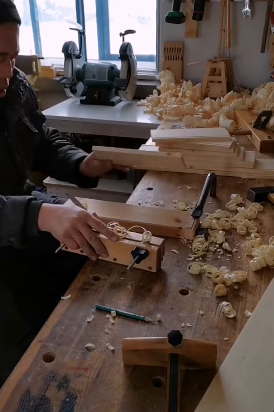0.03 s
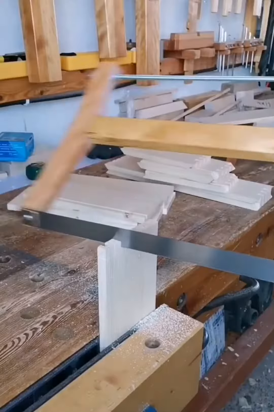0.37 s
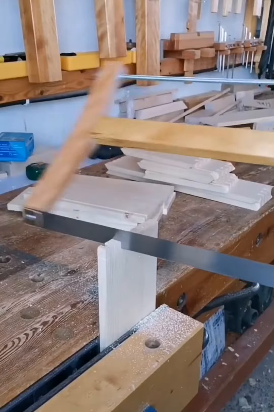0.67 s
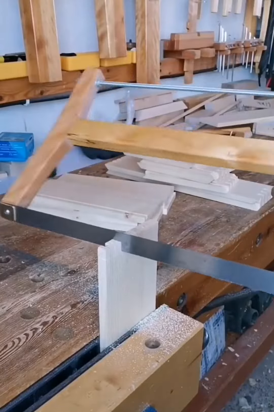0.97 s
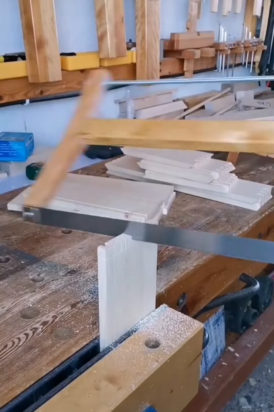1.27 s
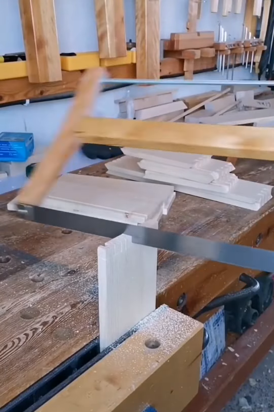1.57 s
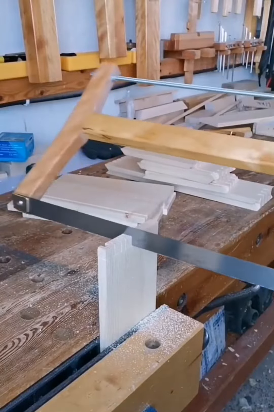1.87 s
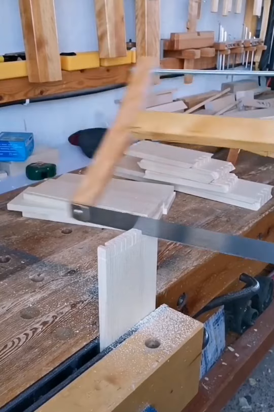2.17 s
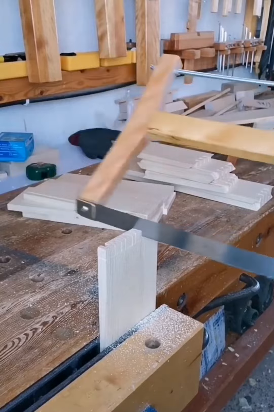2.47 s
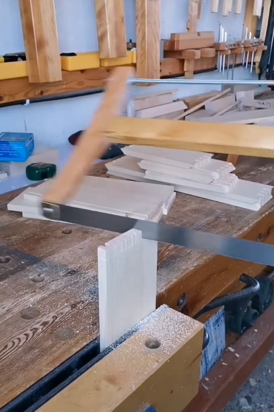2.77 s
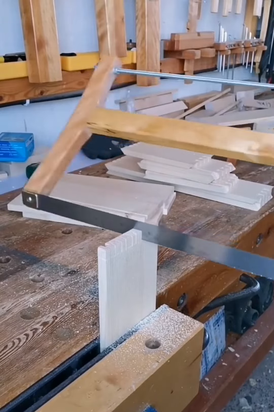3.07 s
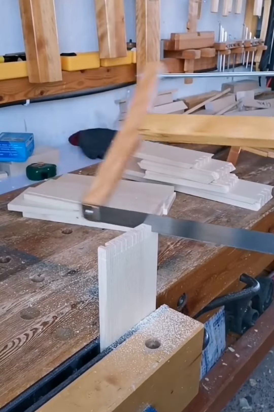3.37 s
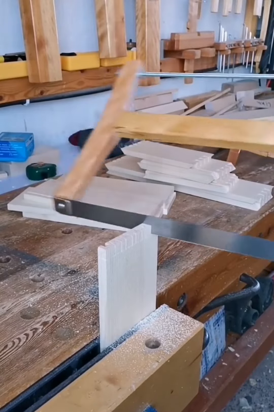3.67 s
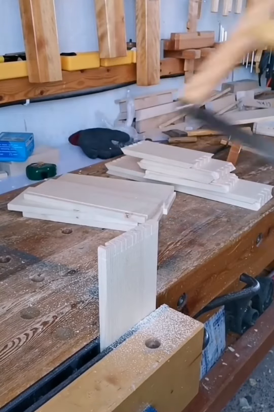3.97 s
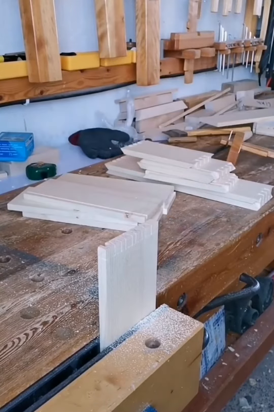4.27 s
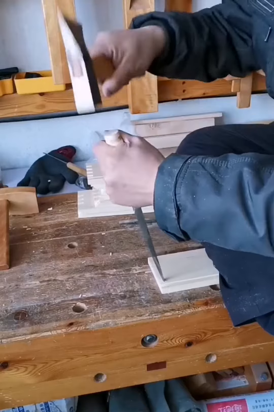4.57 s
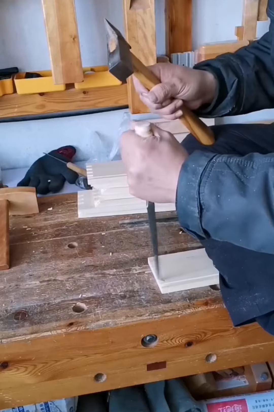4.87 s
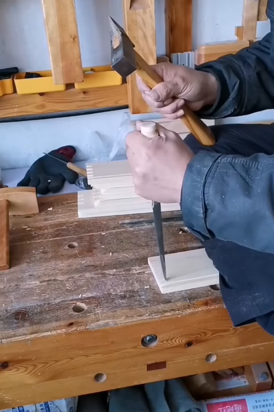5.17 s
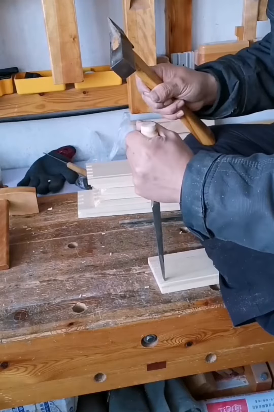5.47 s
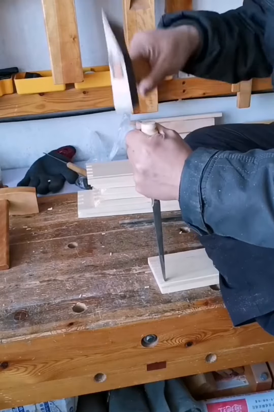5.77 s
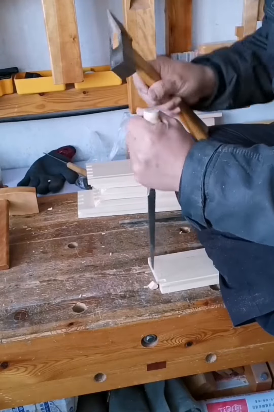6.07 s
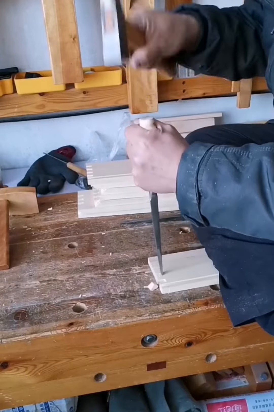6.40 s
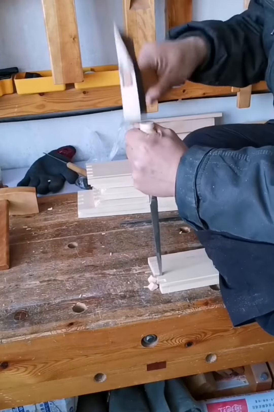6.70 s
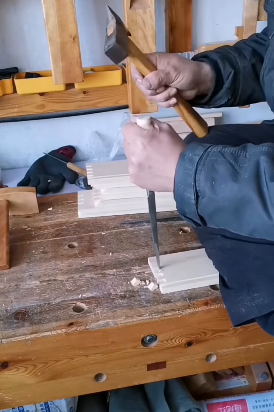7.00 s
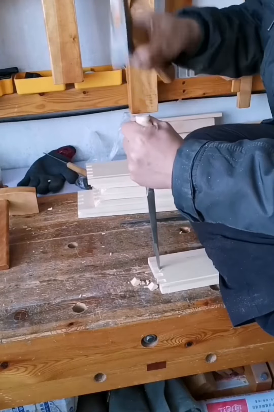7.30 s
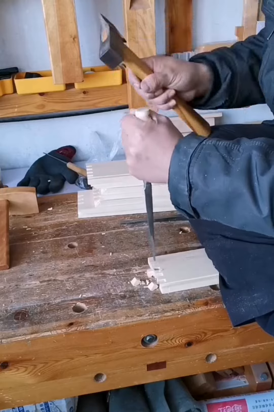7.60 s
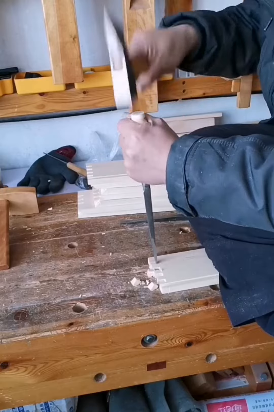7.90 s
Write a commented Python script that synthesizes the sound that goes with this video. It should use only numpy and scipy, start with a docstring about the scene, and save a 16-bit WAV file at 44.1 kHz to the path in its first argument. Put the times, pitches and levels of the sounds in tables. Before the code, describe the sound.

Heard close up in stereo in a small woodworking shop, wood slides on a bench, then a hand saw rasps rapidly back and forth, making the board ring and the bench rumble. The blade lifts out and a soft hiss follows. For the second half, a hammer taps a chisel in quick clusters of two to four sharp knocks, with dull thuds underneath and a short echo over faint room hiss.

```python
"""A board scrapes over a workbench, close to a stereo microphone in a small woodworking shop.
A frame saw then cuts a thin board in the vice, in four runs of quick pushes and pulls: its teeth
tear fibres and shake blade, board and bench. After a soft sliding hiss, a steel hammer drives a
wooden-handled chisel in groups of two to four blows. Handle and steel crack, the bench thuds and
the near walls answer. Behind it all lies the faint hiss of the room."""
import sys
import numpy as np
from scipy import signal
from scipy.fft import rfft, irfft, next_fast_len
from scipy.io import wavfile
from scipy.ndimage import uniform_filter1d

SR = 44100
rng = np.random.default_rng(int(sys.argv[2]) if len(sys.argv) > 2 else 0)


def file_out(sig):
    """Save sig as 16-bit WAV at sys.argv[1]."""
    # one column per channel
    cols = np.atleast_2d(sig).T
    # limit, then scale
    lim = np.clip(cols, -1, 1)
    pcm = np.round(lim * 32767).astype(np.int16)
    wavfile.write(sys.argv[1], SR, pcm)


N = 359106

# At the vice, the saw is pushed and bites: t/s, rise/s, rasp/dB, board ring/dB
SAW_PUSHES = [(.436, 0.0025, -19, -22.5), (.704, 0.019, -19.5, -21.5), (0.954, 0.015, -22, -21),
              (1.139, 0.029, -26.5, -23.5), (1.463, .01, -20, -21), (1.722, 0.011, -20.5, -21.5),
              (1.911, 0.014, -24, -18), (2.017, 0.0033, -19, -23.5), (2.272, .008, -19, -26.5),
              (2.526, 0.0097, -20, -25), (2.777, .01, -20, -22.5), (3.004, 0.024, -25.5, -23),
              (3.232, 0.028, -19, -22.5), (3.492, 0.011, -18.5, -19.5), (3.745, 0.012, -23, -20.5),
              (3.902, 0.01, -31, -23), (3.953, 0.0083, -31.5, -34)]
# It is drawn back, more lightly: t/s, rasp/dB, board ring/dB
SAW_PULLS = [(.571, -25, -21.5), (.847, -24, -26), (1.088, -30.5, -27.5), (1.218, -42.5, -35),
             (1.318, -21.5, -23), (1.611, -25, -24.5), (1.835, -30, -25), (2.147, -24.5, -25),
             (2.404, -25.5, -30), (2.662, -24, -23.5), (2.901, -28, -30.5), (3.118, -25.5, -22.5),
             (3.198, -23, -28), (3.375, -23.5, -22), (3.627, -25, -23.5)]
# Runs with one grip; the last lifts the blade out: stop/s, fizz re rasp/dB, blade re rasp/dB, L-R/dB
SAW_RUNS = [(1.268, -0.5, -25.5, 0.7), (1.965, 0.25, -6, 1.1), (3.156, .5, -12.5, 0.6),
            (3.953, -3.5, -6, 2.2), (4.049, 3, -8, 0.5)]
# Teeth snag and jolt the board: t/s, level/dB, f/Hz
TOOTH_CATCHES = [(.438, -4.5, 666), (1.47, -12, 309.6), (1.92, -14.5, 637), (2.019, -17.5, 830),
                 (2.283, -23, 307), (2.534, -19.5, 666), (2.784, -17, 630), (3.502, -14, 852),
                 (3.912, -11, 601)]
# Hammer on chisel, and a short swell of hiss added just before each crack, not made by the tools:
# t/s, crack/dB, brightness/dB, bench thud/dB, added hiss/dB, L-R/dB
HAMMER_BLOWS = [(4.4742, -9.5, -11, -22, -37, 0.5), (4.6, -13.5, -0.3, -39, -18.5, 0.5),
                (4.7225, -12.5, -0.5, -28, -28, 4), (5.7847, -17.5, -4, -30.5, -29, 1.5),
                (5.939, -15.5, 3, -36, -18, 2), (6.422, -19, -3, -31, -37, 0),
                (6.57, -12.5, 0.4, -39.5, -24, 0), (6.69, -15, -5, -41.5, -32, .5),
                (6.805, -29, -1.5, -39.5, -40.5, -0.5), (7.276, -19.5, -6, -32, -28.5, -1),
                (7.4299, -13, 2.3, -35, -19.5, -1), (7.891, -22.5, -1.5, -41.5, -30.5, 0),
                (8.0139, -17, 4.5, -46, -29.5, -1.5), (8.1348, -27.5, 0, -28, -36, -1.5)]
# Wood slides on the bench: start/s, end/s, rise/s, level/dB, treble lift/dB, hollow note/dB
BOARD_SLIDES = [(0, .07, 0.0017, -37, -12, -23.5), (.06, .25, 0.12, -28, 4.5, -4.5),
                (0.243, 0.37, 0.044, -18.5, -7.5, -13.5), (.368, .392, 0.012, -25, -10.5, -13.5)]
# Light knocks of tools and wood: t/s, tick/dB, bench thud/dB
TOOL_TAPS = [(0.38, -34, -75), (1.262, -32, -66), (4.921, -52, -46.5), (4.961, -50.5, -52.5),
             (7.156, -55, -61)]
# The room's hiss at the microphone: t/s, level/dB
ROOM_TONE_LEVELS = [(0, -68.5), (3.2, -50.5), (5.7, -62), (6.3, -66)]
# Brief dropouts, where the whole sound dips abruptly, then returns: start/s, end/s
DROPOUT_SPANS = [(4.412, 4.455), (6.19, 6.25), (6.981, 7.039), (7.654, 7.712)]

# Resonances: f/Hz, width/Hz, relative level/dB
BOARD_MODES = [(212.6, 25, -6), (277.4, 17, 3), (310.7, 13, 1), (604, 96, -7), (650.5, 28, 1.5),
               (838, 29, -4.5), (932, 66, -11.5)]  # the clamped board
EDGE_MODES = [(368, 19, 2.5), (392, 11, -4), (415, 27, -3.5)]  # its free edge above the vice
FRAME_MODES = [(1148, 55, -2), (1293, 38, 8.5), (1620, 17, -11.5), (2080, 14, -10.5), (2115, 20, -2),
               (2680, 33, 6), (3134, 30, 1)]  # the saw frame with its blade
BLADE_MODES = [(1793, 67, 4.5), (1757, 14, -6.5)]  # the blade under the teeth
BLADE_HIGH_MODES = [(4620, 60, -3), (5200, 60, -2), (5502, 60, 0), (5904, 45, -1), (6500, 70, -3),
                    (7035, 40, -1)]  # the thin blade's treble
HANDLE_MODES = [(414, 490, -12.5), (930, 1000, -7.5), (1540, 690, -1), (2160, 740, -2), (3330, 1000, -8)]  # the chisel's handle
CHISEL_STEEL_MODES = [(4976, 810, 1), (5300, 1100, 3.5), (6910, 400, 1), (9300, 3000, -27),
                      (13000, 2500, -27.5)]  # its steel
# The struck bench: f/Hz, relative level/dB, t60/s
BENCH_MODES = [(80, -16, 0.073), (110, -8, 0.043), (144, 1.5, .085), (166.2, -5.5, 0.078),
               (185.9, -13, .32), (170.5, -25.5, 0.94), (203, -12, 0.24), (283, -14, 0.077),
               (473, -10.5, .06)]

# Spectra: f/Hz, relative density/dB
RASP_SPECTRUM = [(100, -39.5), (250, -3.5), (700, -3), (1000, 2), (1900, 0.5), (3300, 1), (3900, -11),
                 (5000, -34), (9000, -66)]  # tearing fibres
FIZZ_SPECTRUM = [(2500, -31), (4000, -16), (4700, -1.5), (5600, 1), (7100, -0.5), (7700, -9.5), (8300, -10),
                 (9000, -18), (12000, -18.5), (12800, -12.5), (14500, -20.5), (15500, -34), (16500, -52.5)]  # the teeth's treble
RUMBLE_SPECTRUM = [(20, -23), (55, -17.5), (78, 2.5), (130, -0.5), (180, -5.5), (260, -9.5), (600, -62)]  # the bench under the saw
ADDED_HISS_SPECTRUM = [(100, -20), (600, -15.5), (1200, -11), (2200, -1), (3200, -4.5), (4200, -9.5),
                       (6700, 0.5), (8000, -13.5), (11000, -22.5), (15000, -35.5)]  # the hiss added just before each crack
SCRAPE_SPECTRUM = [(30, -32), (130, -11.5), (300, -6.5), (500, -6), (750, 1), (1400, 0), (2100, 1),
                   (3000, 3.5), (4000, -10.5), (8000, -34)]  # wood on wood
SHEEN_SPECTRUM = [(2000, -33), (4300, -8), (6300, 1), (7500, -4), (9500, -16), (14000, -16.5), (16000, -25)]  # the bright top of that scrape
HISS_SPECTRUM = [(47, -54), (80, -32), (166, -10), (221, -1), (270, -12), (308, -2), (439, -5.5), (548, -2),
                 (1140, -5), (3010, -1), (3920, -8), (6670, 1), (7620, -8.5), (14800, -18.5), (15800, -18)]  # the soft slide after the sawing
TAIL_SPECTRUM = [(60, -13), (200, -0.5), (450, -6.5), (700, -5), (1100, -2.5), (1800, -1.5), (2800, 0),
                 (4100, -7), (5500, -1), (6800, -1), (8200, -11), (11000, -17), (14000, -18.5),
                 (16000, -44)]  # the echo off the walls
ROOM_TONE_SPECTRUM = [(15, -43), (25, -12.5), (129, 0.5), (152, -2), (297, -5), (399, -6), (433, -5),
                      (509, -7), (4260, -15), (15500, -20.5)]  # the quiet shop
# The small room's decay: f/Hz, t60/s
ROOM_DECAY = [(150, 0.29), (500, 0.35), (2500, 0.29), (7000, 0.24), (14000, 0.082)]
# Likeness of the microphone's two sides: f/Hz, correlation
STEREO_LIKENESS = [(80, .9), (180, .7), (350, 0.47), (800, 0.22), (2000, 0.033), (10000, 0.029)]

SAW_SIZE, RING_SIZE = int(4.2 * SR), SR // 2  # samples
TURN_S = .006  # strokes overlap at a turn


def saw():
    """Close up, the teeth drive blade, board and bench, each from its own place in the stereo image."""
    drive, speed = saw_motion()
    # the point of contact travels along the blade, so the colour wanders
    bites = patchy(tooth_bites(speed), depth_db=3.2, size=1024)
    frame = amp(-6.5) * resonated(bites[::-1], FRAME_MODES) * panned(6.3)
    rasp = amp(-1.6) * coloured(bites, RASP_SPECTRUM) + frame
    steel = amp(-11) * resonated(bites[::-1], BLADE_HIGH_MODES)
    fizz = (coloured(bites, FIZZ_SPECTRUM) + steel) * panned(-3.9)
    # the blade's changing pressure bends the board's notes
    wood = np.concatenate([resonated(bites, BOARD_MODES), resonated(bites, EDGE_MODES)])
    wood = gliding(wood, depth=.025, size=3000)
    board, edge = wood[:2] * panned(1.5), wood[2:] * panned(2.2)
    blade = resonated(bites, BLADE_MODES) * panned(2.2)
    bench = coloured(bites, RUMBLE_SPECTRUM) * panned(-.5)
    cut = np.sum(drive * np.array([rasp, fizz, board, edge, blade, bench]), axis=0)
    return np.pad(cut, ((0, 0), (0, N - SAW_SIZE)))


def saw_motion(usual_stroke_s=.12, entry_db=-9, entry_s=.3):
    """The drive on rasp, fizz, board, edge, blade and bench, and the speed, which drops at each turn."""
    drive, speed = np.zeros((6, 2, SAW_SIZE)), np.full(SAW_SIZE, .3)
    for s, rise, fade_db, db, board_db, extra_fizz_db, edge_db, bench_db in strokes():
        _, fizz_db, blade_db, pan_db = next(run for run in SAW_RUNS if run[0] > s + TURN_S)
        length = stroke_length(s)
        force_db, gate = hand_force(length, rise, fade_db)
        rasp = db + force_db
        fizz = db + fizz_db + extra_fizz_db + 1.14 * force_db  # grows faster than the force
        wood = board_db + hand_force(length, .86 * rise, fade_db)[0]  # peaks ahead of the rasp
        # the bench shakes more on short strokes, less until the teeth are well in the cut
        stall_db = 5 * np.log2(usual_stroke_s / length)
        easing_db = entry_db * np.exp((SAW_PUSHES[0][0] - s) / entry_s)
        bench = wood + bench_db + stall_db + easing_db
        gains = amp([rasp, fizz, wood, wood + edge_db, rasp + blade_db, bench])
        add(drive, s, gains[:, None] * panned(pan_db) * gate)
        add(speed, s, .7 * np.sin(np.linspace(0, np.pi, len(gate))))
    return drive, speed


def strokes():
    """Each stroke: t/s, rise/s, then fade, rasp, board, extra fizz, edge and bench re board, all /dB."""
    for s, rise, db, board_db in SAW_PUSHES:
        yield s, rise, 13.5, db, board_db, 0, -2, -11
    for s, db, board_db in SAW_PULLS:  # teeth dragged backwards hiss more
        yield s, .4 * stroke_length(s), 9, db, board_db, 1.4, -9, -14


def stroke_length(start):
    """A stroke lasts until the saw turns or stops."""
    turns = [row[0] for row in [*SAW_PUSHES, *SAW_PULLS, *SAW_RUNS]]
    return min(s for s in turns if s > start + TURN_S) - start


def hand_force(length, rise, fade_db, start_db=-8.5):
    """A stroke's force in dB (it swells, holds, then drops as the hand slows) and its on-off gate."""
    t = np.arange(int((length + TURN_S) * SR)) / SR
    rise = np.clip(rise, .002, .9 * length)
    swell = np.clip(1 - t / rise, 0, 1) ** 2
    fade = np.clip((t - rise) / (length - rise), 0, 1) ** 2.1
    opening, closing = t / max(TURN_S, .2 * rise), (t[-1] - t) / TURN_S
    return start_db * swell - fade_db * fade, np.clip(np.minimum(opening, closing), 0, 1)


def tooth_bites(speed, tooth_rate_hz=620, scatter_db=1.5, bite_s=.0005, rub=2.5):
    """Each passing tooth tears a burst of fibres; faster strokes bring more teeth."""
    rate_hz = tooth_rate_hz * speed * amp(2 * rng.standard_normal(SAW_SIZE))
    teeth_passed = np.floor(np.cumsum(rate_hz) / SR)
    strength = amp(scatter_db * np.clip(rng.standard_normal(SAW_SIZE), -2, 2))
    bites = np.diff(teeth_passed, prepend=0) * strength
    tearing = signal.lfilter([1], [1, -np.exp(-1 / (bite_s * SR))], bites)
    return spread((unit(tearing) + rub) * rng.standard_normal((2, SAW_SIZE)))


def catches(t60=.05, attack_s=.0048):
    """A tooth snags at the start of a stroke and the board rings briefly, a little left of centre."""
    out, t = np.zeros((2, N)), np.arange(SR // 8) / SR
    for s, db, hz in TOOTH_CATCHES:
        phase = 2 * np.pi * hz * t + rng.normal(0, .4, (2, 1))
        add(out, s, amp(db - 60 * t / t60) * (1 - np.exp(-t / attack_s)) * np.sin(phase))
    return out * panned(2)


def blade_ring(start_s=4.008, rise_s=.024, db=-30):
    """The blade sings briefly as it is drawn out of the cut."""
    out, t = np.zeros((2, N)), np.arange(SR // 6) / SR
    swell = (t / rise_s) ** 2 * np.exp(2 - 2 * t / rise_s)
    ring = resonated(noise(len(t)), [(4517, 20, 0), (4732, 40, -8)])
    add(out, start_s, amp(db) * swell * ring)
    return out


def chisel(hiss_s=.03, early_s=.0008, echo_db=-14.5, hiss_echo_db=3.5):
    """Each blow: the chisel cracks under the hammer, the bench thuds and the near walls answer."""
    out = np.zeros((2, N))
    swell = np.linspace(0, 1, int(hiss_s * SR)) ** 1.5
    near_walls = 1 + .9 * np.exp(-np.arange(RING_SIZE) / SR / .0067)
    for s, db, bright_db, thud_db, hiss_db, pan_db in HAMMER_BLOWS:
        place = panned(pan_db)
        # a short swell of hiss added just before each crack, not made by the tools
        added_hiss = swell * coloured(noise(len(swell)), ADDED_HISS_SPECTRUM)
        add(out, s - hiss_s, amp(hiss_db) * place * added_hiss)
        add(out, s - early_s, amp(db) * place * crack(bright_db))
        add(out, s, amp(thud_db) * thud())
        # a dull blow leaves a dull echo
        treble_shelf = [(3000, 0), (6000, .87 * bright_db)]
        tail = filtered(room_tail(), lambda hz: amp(along(treble_shelf, hz)))
        echo_gain = amp(echo_db) * np.hypot(amp(db), amp(hiss_db + hiss_echo_db))
        add(out, s, echo_gain * place * near_walls * tail)
    return out


def crack(bright_db, contact_s=.00065, span_s=.0031):
    """A short crushing contact rings handle and steel, with the energy of rms 1 over span_s."""
    t = np.arange(SR // 20) / SR
    contact = t / contact_s * np.exp(-t / contact_s) * rng.standard_normal((2, len(t)))
    contact = contact + .33 * contact[::-1]  # each side hears some of the other
    ring = resonated(contact, HANDLE_MODES) + amp(bright_db) * resonated(contact, CHISEL_STEEL_MODES)
    return unit(ring) * np.sqrt(span_s / t[-1])


def thud(attack_s=.0036):
    """The bench's low modes waver, at new strengths for each blow; rms 1 over the first 25 ms."""
    t = np.arange(RING_SIZE) / SR
    ring = 0
    for hz, db, t60 in BENCH_MODES:
        waver = np.cumsum(rng.standard_normal(RING_SIZE)) * 4 / np.sqrt(SR)
        phase = 2 * np.pi * (hz * t + rng.random()) + waver + rng.normal(0, .21, (2, 1))
        ring = ring + amp(db + rng.normal(0, 2.2) - 60 * t / t60) * np.sin(phase)
    fade_out = np.clip(10 * (1 - t / t[-1]), 0, 1)
    ring = ring * (1 - np.exp(-t / attack_s)) * fade_out
    return ring / np.sqrt(np.mean(ring[:, :SR // 40] ** 2))


def board_slide(grain_db=.5):
    """Wood rubs on the bench top: a grainy scrape and a bright sheen over the board's hollow note."""
    drive = np.zeros((3, 1, N))
    for start, end, rise, db, lift_db, hollow_db in BOARD_SLIDES:
        force_db, gate = hand_force(end - start, rise, fade_db=17.5, start_db=-25)
        add(drive, start, amp([0, lift_db, hollow_db])[:, None, None] * amp(db + force_db) * gate)
    rub = noise(N) * amp(grain_db * unit(uniform_filter1d(rng.standard_normal(N), size=90)))
    scrape = amp(-3) * coloured(rub, SCRAPE_SPECTRUM)
    whistle = amp(-13.5) * resonated(rub[::-1], [(6450, 420, 0)])
    sheen = (amp(-1.5) * coloured(rub, SHEEN_SPECTRUM) + whistle) * panned(-2.5)
    hollow = resonated(noise(N), [(480, 56, -2), (592, 100, -4.5)]) * panned(3.6)
    return np.sum(drive * np.array([scrape, sheen, hollow]), axis=0)


def sliding_hiss(start_s=4.02, end_s=4.41, rise_s=.15, db=-33):
    """Between saw and chisel, a soft sliding hiss swells, sinks and stops short."""
    out = np.zeros((2, N))
    force_db, gate = hand_force(end_s - start_s, rise_s, fade_db=9, start_db=-12)
    add(out, start_s, amp(db + force_db) * gate * coloured(noise(len(gate)), HISS_SPECTRUM))
    return out


def taps(bright_db=-6, echo_db=-2, echo_s=.008):
    """Small contacts of tools and wood: a tick, a short echo and a soft thud of the bench."""
    out = np.zeros((2, N))
    echo_fade = np.exp(-np.arange(RING_SIZE) / SR / echo_s)
    for s, db, thud_db in TOOL_TAPS:
        add(out, s, amp(db) * crack(bright_db))
        add(out, s, amp(db + echo_db) * room_tail() * echo_fade)
        add(out, s, amp(thud_db) * thud())
    return out


def room_tail():
    """Diffuse sound returns from the walls to the microphone; the treble dies first."""
    hz, t, bands = signal.stft(coloured(noise(RING_SIZE), TAIL_SPECTRUM), SR, nperseg=256)
    decay = amp(-60 * t / along(ROOM_DECAY, hz)[:, None])
    return signal.istft(bands * decay, SR, nperseg=256)[1][:, :RING_SIZE]


def room_tone():
    """The faint hiss of the quiet shop, all round the microphone."""
    times, levels_db = np.transpose(ROOM_TONE_LEVELS)
    return amp(np.interp(np.arange(N) / SR, times, levels_db)) * coloured(noise(N), ROOM_TONE_SPECTRUM)


def dropouts(dip_db=-14, ramp_s=.006):
    """Brief dropouts: the whole sound dips abruptly, then returns."""
    t = np.arange(N) / SR
    inside = sum(np.clip(np.minimum(t - start, end - t) / ramp_s, 0, 1) for start, end in DROPOUT_SPANS)
    return amp(dip_db * inside)


def amp(db):
    """Decibels to gain."""
    return 10 ** (np.asarray(db) / 20)


def unit(x):
    """x at rms 1."""
    return x / np.sqrt(np.mean(x ** 2) + 1e-20)


def along(points, hz):
    """Interpolate (f/Hz, value) points on a log frequency axis."""
    freqs, values = np.transpose(points)
    return np.interp(np.log(hz + 1), np.log(freqs + 1), values)


def filtered(x, response):
    """x through a complex frequency response."""
    n = x.shape[-1]
    padded = next_fast_len(n + 8192)
    return irfft(rfft(x, padded) * response(np.fft.rfftfreq(padded, 1 / SR)), padded)[..., :n]


def coloured(x, spectrum):
    """x shaped by a smooth spectrum, at rms 1."""
    return unit(filtered(x, lambda hz: amp(along(spectrum, hz))))


def resonated(x, modes):
    """x through a body's resonances, alternating in sign, at rms 1."""
    def response(hz):
        return sum((-1) ** k * amp(db) * 1j * hz * width / (centre ** 2 - hz ** 2 + 1j * hz * width)
                   for k, (centre, width, db) in enumerate(modes))
    return unit(filtered(x, response))


def patchy(x, depth_db, size):
    """x with a random colour that drifts within about a tenth of a second."""
    bands = signal.stft(x, nperseg=size)[2]
    drift = uniform_filter1d(rng.standard_normal(bands.shape), size=3, axis=1)
    drift = uniform_filter1d(drift, size=max(SR // 4 // size, 2), axis=2)
    return unit(signal.istft(bands * amp(depth_db * unit(drift)), nperseg=size)[1][:, :x.shape[-1]])


def gliding(x, depth, size):
    """x with its pitch drifting by the share depth, over size samples."""
    n = x.shape[-1]
    drift = uniform_filter1d(uniform_filter1d(rng.standard_normal(n), size), size)
    position = np.cumsum(1 + depth * unit(drift - drift.mean()))
    return np.array([np.interp(position, np.arange(n), side) for side in x])


def spread(pair):
    """Two unrelated signals become the microphone's sides: alike in the bass, apart in the treble."""
    def weights(hz):
        angle = np.arccos(along(STEREO_LIKENESS, hz)) / 2
        return np.array([np.cos(angle), np.sin(angle)])
    mid, side = filtered(pair, weights)
    return np.array([mid + side, mid - side])


def noise(size):
    """White stereo noise."""
    return unit(spread(rng.standard_normal((2, size))))


def panned(db):
    """Left and right gains for a source that is db louder on the left."""
    return unit(amp([[db / 2], [-db / 2]]))


def add(track, s, sound):
    """Mix a sound into the track at time s."""
    i = max(round(s * SR), 0)
    track[..., i:i + sound.shape[-1]] += sound[..., :max(track.shape[-1] - i, 0)]


def scene():
    """The shop as heard from beside the bench, with brief dropouts."""
    sawing = saw() + catches() + blade_ring()
    return (sawing + board_slide() + sliding_hiss() + chisel() + taps() + room_tone()) * dropouts()


def record(dry, top_hz=15900):
    """After the microphone, the loudest peaks are rounded off and the treble ends at top_hz."""
    rounded = dry / (1 + dry ** 6) ** (1 / 6)
    return filtered(rounded, lambda hz: hz < top_hz)


dry = scene()
out = record(dry)
file_out(out)
```